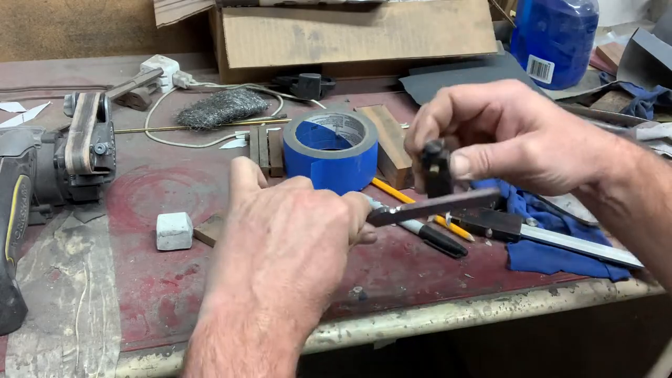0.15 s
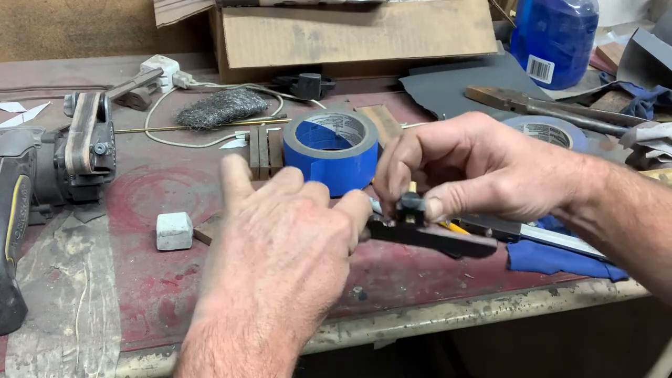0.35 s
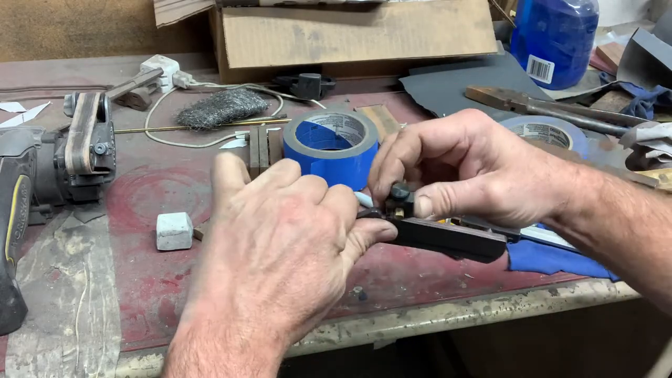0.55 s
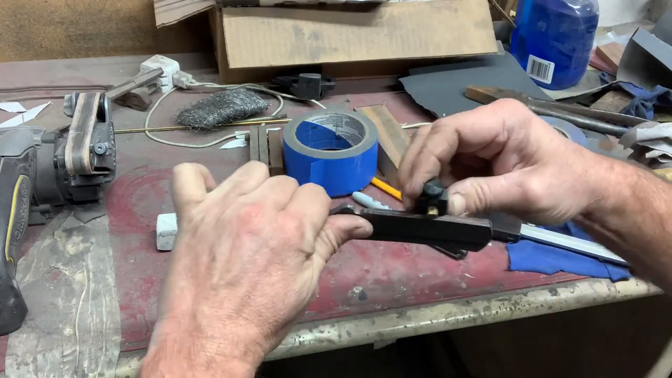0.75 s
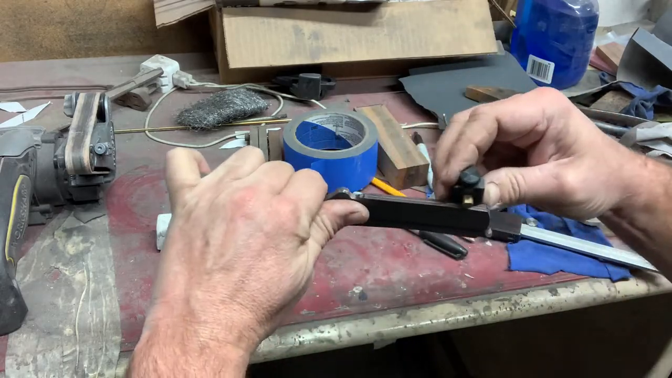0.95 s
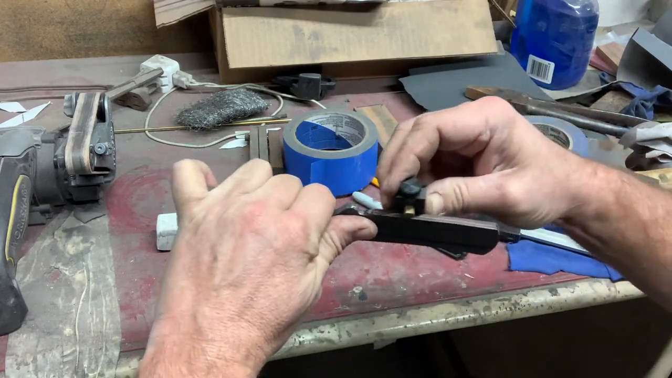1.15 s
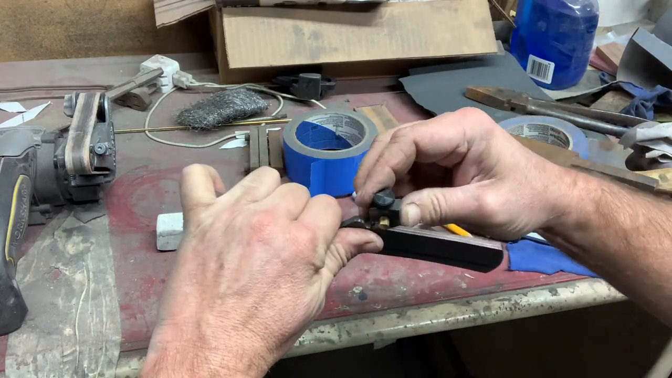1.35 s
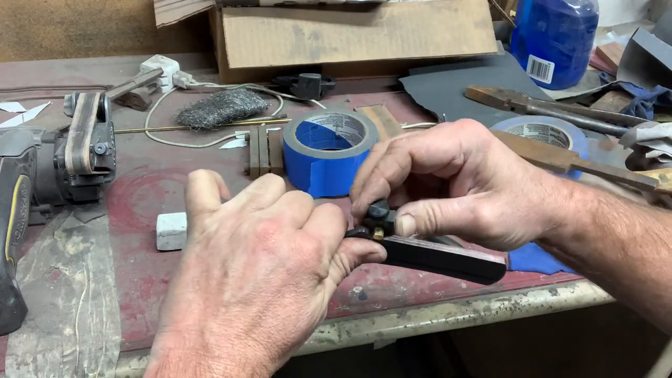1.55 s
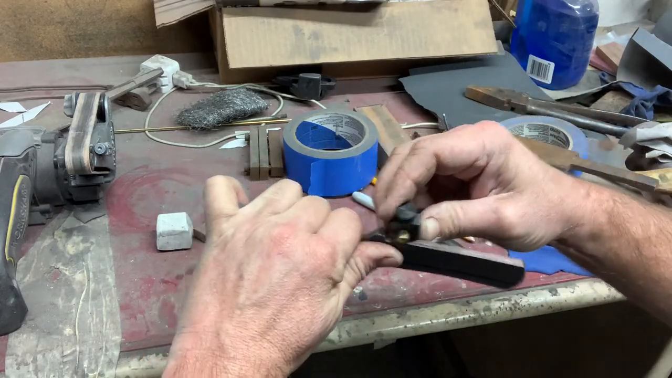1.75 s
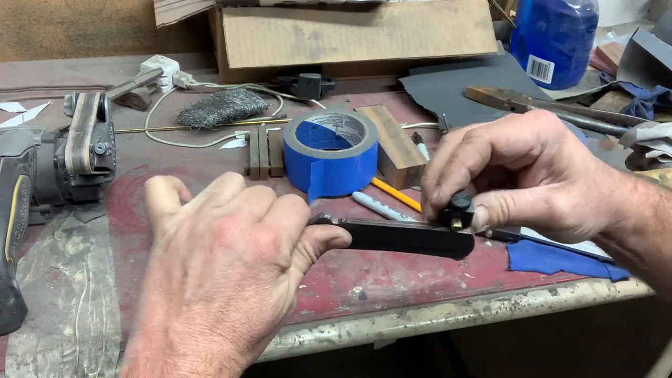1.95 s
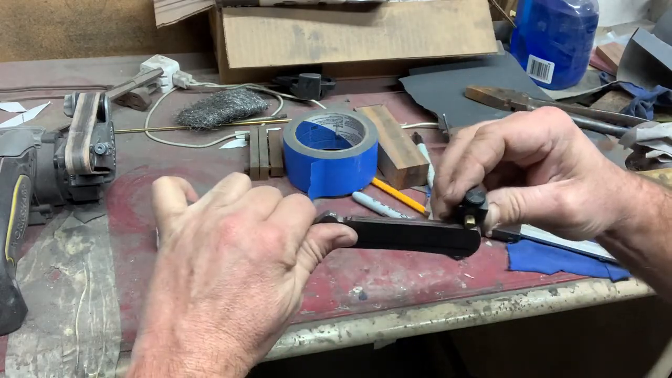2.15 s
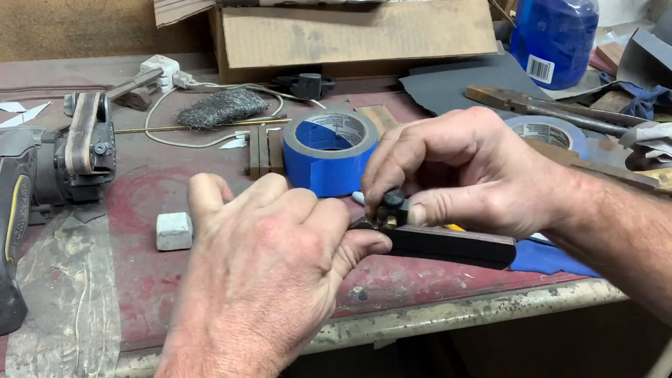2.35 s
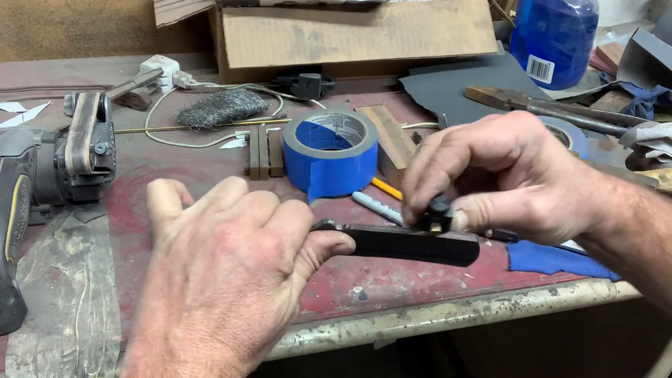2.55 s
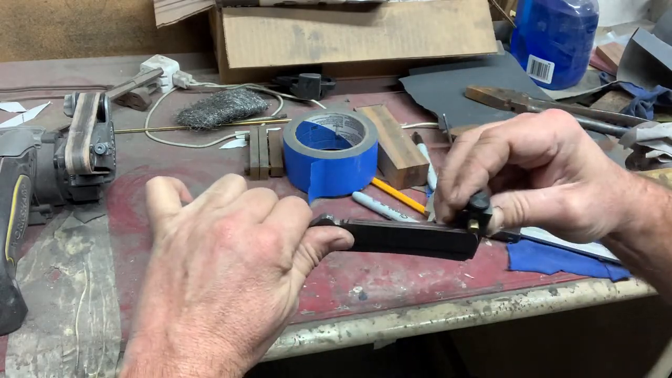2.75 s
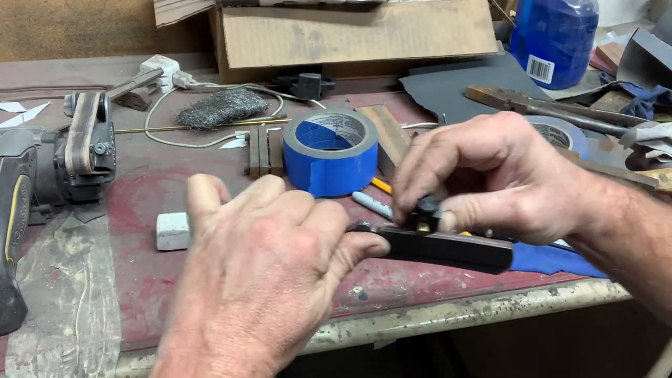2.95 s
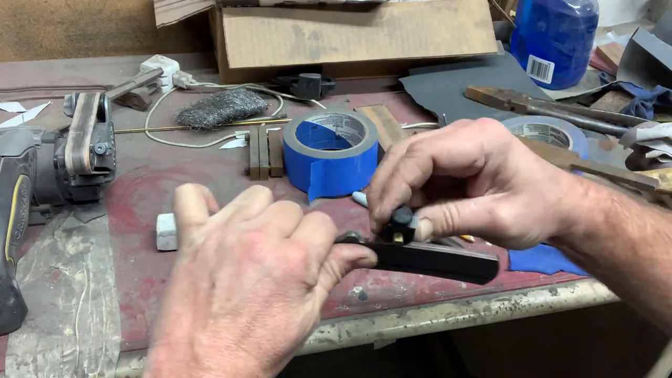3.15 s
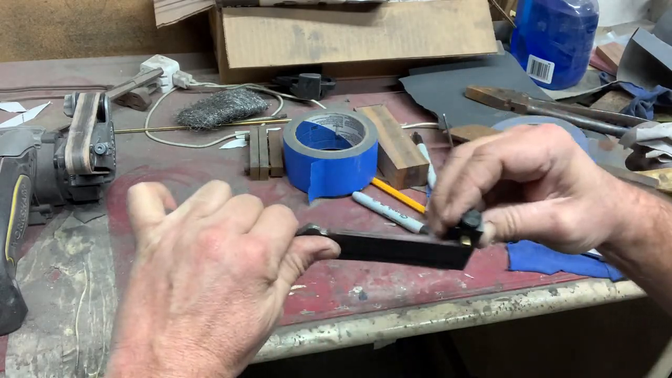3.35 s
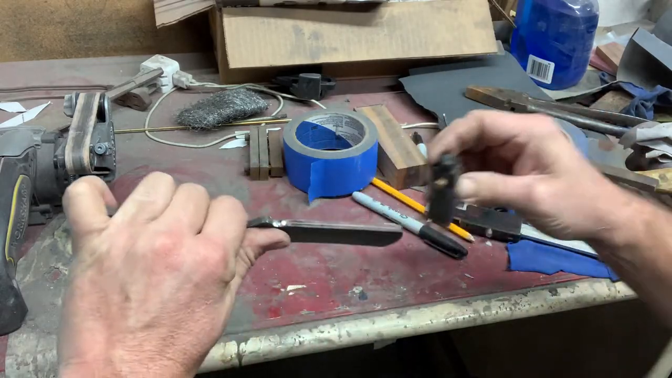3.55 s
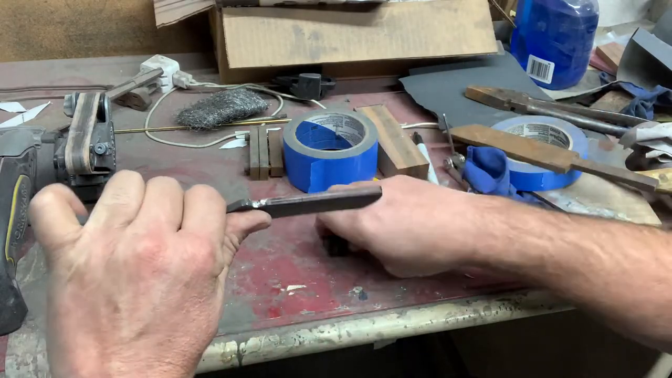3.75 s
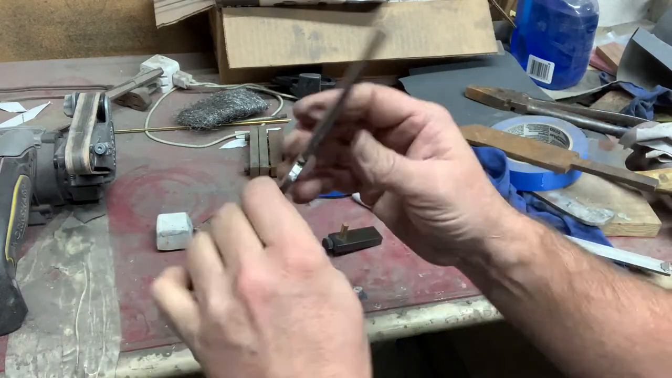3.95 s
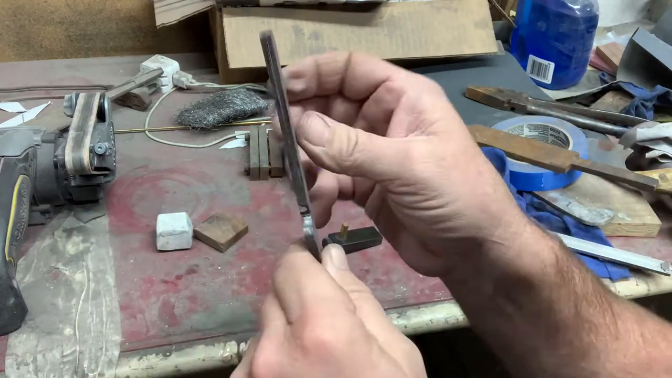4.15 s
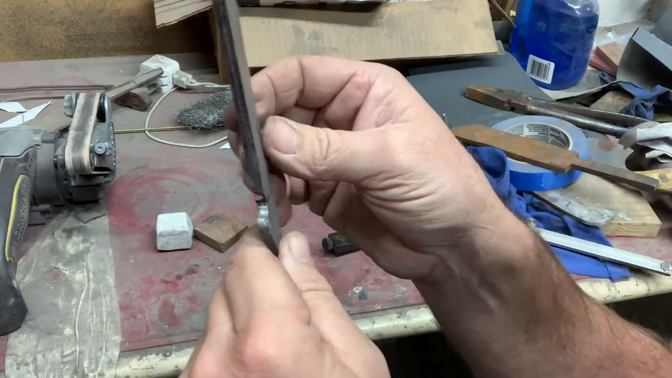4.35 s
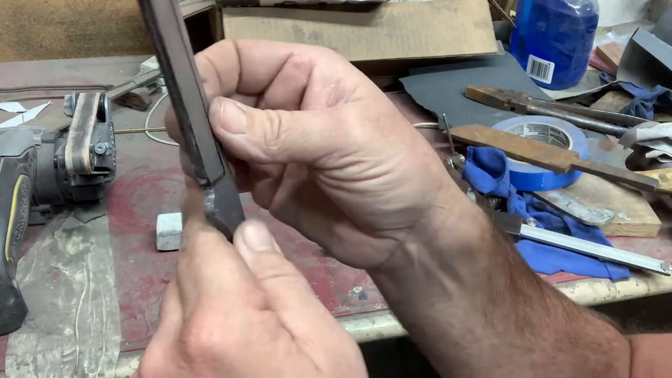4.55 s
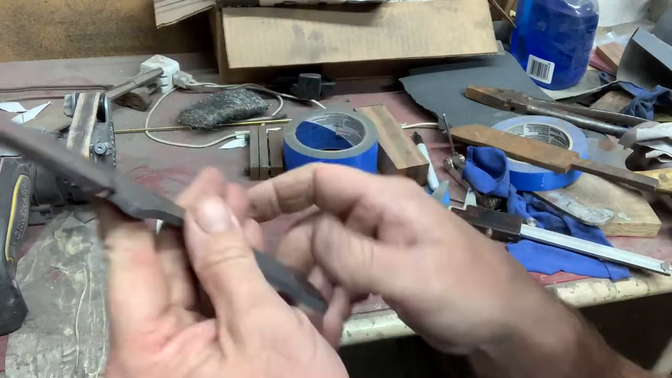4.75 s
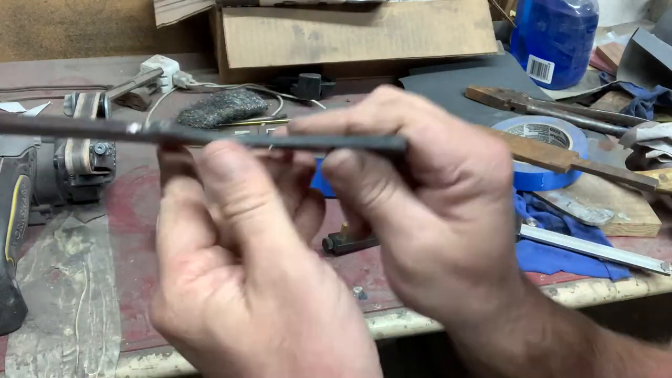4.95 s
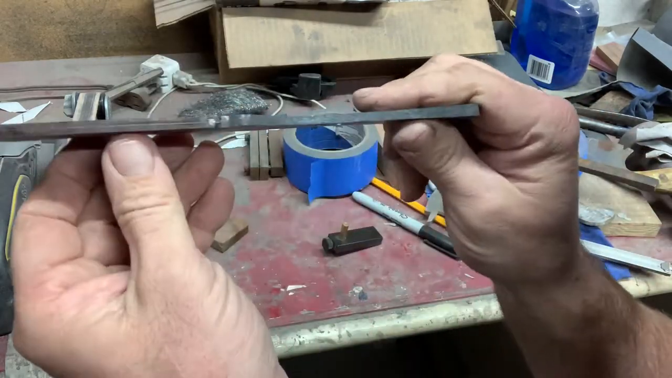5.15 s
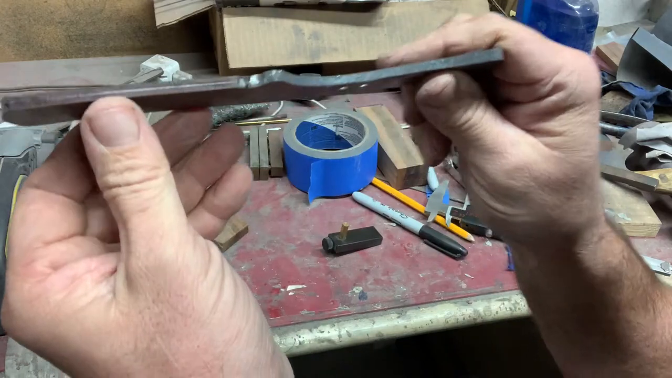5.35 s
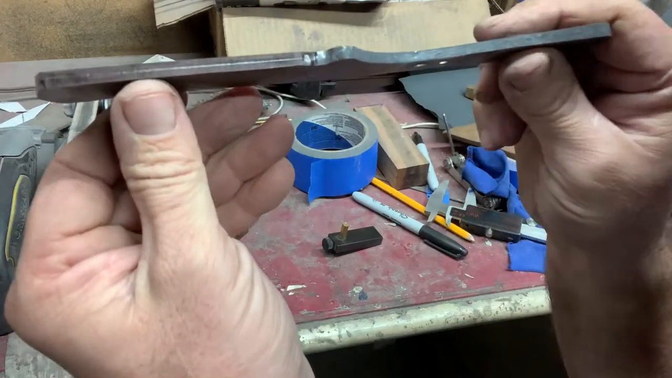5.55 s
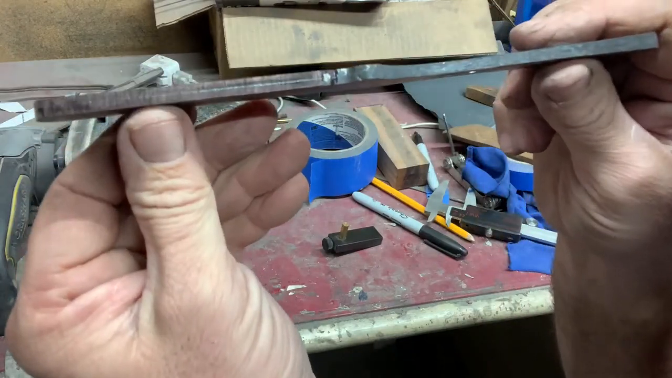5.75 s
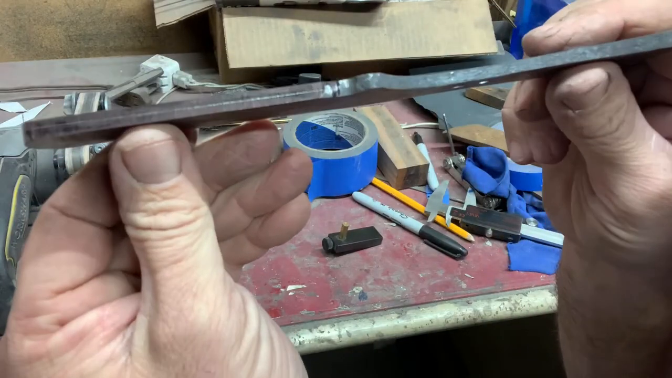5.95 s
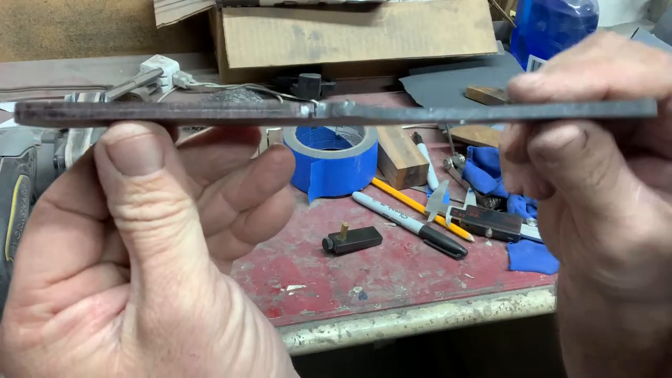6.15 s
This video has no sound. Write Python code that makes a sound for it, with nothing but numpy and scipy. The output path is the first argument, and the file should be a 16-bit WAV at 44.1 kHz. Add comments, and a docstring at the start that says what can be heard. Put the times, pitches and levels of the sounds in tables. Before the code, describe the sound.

A metal point scrapes a steel blade in short bright scratches, then a small tool knocks onto a bench, over a low fan hum.

```python
"""A scribe point is drawn along a steel blade in short strokes: random slips, shaped by pressure, ring the steel.
Brief noise skids and decaying sines make its ticks; light slips make fingers rustle, a swept sine squeaks.
The gauge that holds the scribe is put down on the bench: filtered pushes with a rattle drive bench modes.
A fan hums behind it all: coloured stereo noise with room modes and wavering motor tones."""
import sys
import numpy as np
from scipy import signal
from scipy.fft import rfft, irfft
from scipy.io import wavfile
from scipy.ndimage import uniform_filter1d

SR = 44100
rng = np.random.default_rng(int(sys.argv[2]) if len(sys.argv) > 2 else 0)


def transcribe(signal):
    """Save signal, clipped to [-1, 1], as a 16-bit WAV file at the path in sys.argv[1]."""
    frames = np.atleast_2d(signal).T
    limited = np.clip(frames, -1, 1)
    pcm = np.round(limited * 32767).astype(np.int16)
    wavfile.write(sys.argv[1], SR, pcm)


N = 273861
TIME = np.arange(N) / SR  # s
FFT_HZ = np.fft.rfftfreq(N, 1 / SR)


def gain_of(db):
    """Decibels to amplitude."""
    return 10 ** (np.asarray(db) / 20)


def evened(x):
    """Scales to rms 1."""
    return x / np.sqrt(np.mean(x ** 2) + 1e-20)


def read(points, hz):
    """Interpolates a table on a log-frequency axis."""
    f, value = np.transpose(points)
    return np.interp(np.log(hz + 1), np.log(abs(f) + 1), value)


def add(mix, start_s, sound):
    """Mixes a sound in at a time, in place."""
    part = mix[round(start_s * SR):][:len(sound)]
    part += sound[:len(part)]


def wander(hz):
    """Random motion of rms 1, mostly slower than hz."""
    lowpass = 1 / (1 + (FFT_HZ / hz) ** 4)
    return evened(irfft(rfft(rng.standard_normal(N)) * lowpass, N))


def treble(x, hz):
    """The part of a sound above hz."""
    highpass = 1 - 1 / (1 + (FFT_HZ / hz) ** 12)
    return irfft(rfft(x) * highpass, N)


def body(drive, colour, modes, size=16384):
    """An object answers each push with a short causal click and its dying modes."""
    hz = abs(np.fft.fftfreq(size, 1 / SR))
    t = np.arange(size) / SR
    # minimum phase: the log spectrum and its Hilbert transform give a causal click
    click = np.exp(np.conj(signal.hilbert(np.log(gain_of(read(colour, hz))))))
    ring = np.zeros(size)
    for f, db, t60_s in modes:
        peak_scale = 2 * np.log(1000) / (t60_s * SR)  # makes db the resonance gain
        ring += gain_of(db - 60 * t / t60_s) * np.cos(2 * np.pi * f * t) * peak_scale
    answer = np.fft.ifft(click * (1 + np.fft.fft(ring))).real
    return signal.oaconvolve(drive, answer / np.linalg.norm(answer))[:N]


# Workshop decay. Each row: frequency in Hz, t60 in s.
ROOM_DECAY = [(300, 0.75), (1500, 0.24), (3000, 0.19), (6000, 0.19), (10000, 0.1807), (16000, 0.1)]


def room(spacing=8):
    """Sparse reflections off bench clutter and walls, one per spacing samples; treble dies first."""
    at = np.arange(100, SR // 2, spacing)
    places = at + rng.integers(0, spacing, (2, len(at)))
    taps = np.zeros((2, SR // 2 + spacing))
    np.put_along_axis(taps, places, rng.choice([-1., 1.], (2, len(at))), 1)
    hz, t, bands = signal.stft(taps, SR, nperseg=256)
    decay = gain_of(-60 * t / read(ROOM_DECAY, hz)[:, None])
    tail = signal.istft(bands * decay, SR, nperseg=256)[1]
    return tail / np.linalg.norm(tail[0])


def place(x, phase, lean, wet_db):
    """The direct sound reaches the two ports out of step and unequally loud; the room follows."""
    half = gain_of(read(lean, FFT_HZ) / 2)
    left_right = np.array([half * np.exp(1j * read(phase, FFT_HZ)), 1 / half])
    direct = irfft(rfft(x) * left_right, N)
    reflected = signal.fftconvolve(np.atleast_2d(x), room(), axes=1)[:, :N]
    return direct + gain_of(wet_db) * reflected


def friction(slips_per_s, spread_db, chatter_hz, chatter_db):
    """Tiny slips of uneven size; the chatter of the contact swells and thins them."""
    size = gain_of(spread_db * np.minimum(rng.exponential(1, N), 4)) * rng.choice([-1., 1.], N)
    slips = size * (rng.random(N) < slips_per_s / SR)
    return evened(slips * gain_of(chatter_db * wander(chatter_hz)))


RUN_IN_DB, RELEASE_DB_PER_S = 46.5, 699.5


def rub(start_s, run_in_s, hold_s, db, change_db=0):
    """Amplitude of one rubbing gesture: it swells, holds while the pressure drifts, and lifts off."""
    t = TIME - start_s
    swell = RUN_IN_DB * np.minimum(t / max(run_in_s, .002), 0)
    held = change_db * np.clip(t / max(hold_s, .002), 0, 1)
    lift = RELEASE_DB_PER_S * np.maximum(t - hold_s, 0)
    return gain_of(np.maximum(db + swell + held - lift, -200))


def travel(x, shared_db, apart_db, apart_radians, frames=9):
    """As if passing nodes of the blade, bands swell and fade at random, a little differently at each port."""
    bands = signal.stft(x, nperseg=512, noverlap=384)[2]
    noise = rng.standard_normal((5,) + bands.shape)
    smooth_hz = uniform_filter1d(noise, size=3, axis=1)
    patches = evened(uniform_filter1d(smooth_hz, size=frames, axis=2))
    level = gain_of(shared_db * patches[0] + apart_db * patches[1:3])
    turn = np.exp(1j * apart_radians * patches[3:])
    return signal.istft(bands * level * turn, nperseg=512, noverlap=384)[1][:, :N]


# Fan air noise. Each row: frequency in Hz, relative density in dB per Hz.
AIR_COLOUR = [(20, -47), (48, -29.5), (75, -12), (170, -9.5), (230, -15), (340, -17.5), (800, -17),
              (1300, -19.5), (2500, -27.3), (5000, -34), (8000, -43.5), (12000, -55), (16000, -62)]
# Room modes under the fan. Each row: frequency in Hz, width in Hz, boost in dB.
ROOM_BOOM = [(83, 18, 4), (120.8, 21, 10.5), (163.1, 20.7, 11.5), (282, 23, 6.5), (367, 12, 5.5),
             (741, 48, 6)]
# Left-right likeness of the air noise. Each row: frequency in Hz, coherence from -1 to 1.
AIR_COHERENCE = [(60, 1), (130, 0.96), (290, 0.87), (640, 0.43), (1410, -0.42), (3100, -0.086),
                 (6820, -0.37), (15000, 0.97)]
# Slow swell of the rumble. Each row: time in s, gain in dB.
RUMBLE_SWELL = [(0, 0.5), (1.2, 1), (2.4, 1), (3.4, 0), (4.4, -1.5), (5.4, 0.5), (6.2, -0.5)]
# Motor tones. Each row: frequency in Hz before drift, rms level in dB before waver.
MOTOR_TONES = [(201.7, -59.5), (240, -68.5), (403.6, -67.5)]
AIR_DB = -49


def fan(waver_db=2.5, drift_hz=0.84):
    """Air noise booms in the room's low modes under the motor's wavering tones."""
    first, second = rfft(rng.standard_normal((2, N)))
    same = np.clip(read(AIR_COHERENCE, FFT_HZ), -1, 1)
    colour = read(AIR_COLOUR, FFT_HZ)
    for f, width_hz, db in ROOM_BOOM:
        colour = colour + db / (1 + (2 * (FFT_HZ - f) / width_hz) ** 2)
    # (Hz, dB taken from the left and given to the right)
    lean = read([(300, 0), (800, 0.75), (1300, 1.17), (4000, 0.34)], FFT_HZ)
    left_right = np.array([first, same * first + np.sqrt(1 - same ** 2) * second])
    air = evened(irfft(left_right * gain_of([colour - lean, colour + lean]), N))
    rumble = air - treble(air, hz=259)
    swell = gain_of(np.interp(TIME, *np.transpose(RUMBLE_SWELL)))

    drift, waver = drift_hz * wander(2.91), waver_db * wander(3.1)
    tones = np.zeros(N)
    for f, db in MOTOR_TONES:
        turns = np.cumsum(f + drift) / SR
        tones += np.sqrt(2) * gain_of(db + waver) * np.sin(2 * np.pi * turns)
    return gain_of(AIR_DB) * (air + (swell - 1) * rumble) + tones


# The gauge lands and rocks once. Each row: start in s, relative level in dB, contact time in s.
BENCH_KNOCKS = [(3.7215, -13.5, 0.000092), (3.7236, -1.5, 0.00015), (3.7563, -6, 0.00068)]
# Colour of a blow on the bench. Each row: frequency in Hz, relative density in dB per Hz.
THUD_COLOUR = [(100, -44), (450, -15), (650, -14), (850, -16), (1080, -22), (1300, -4), (1720, -13),
               (2100, -5.5), (2450, -10.5), (2900, -4), (3500, -8.5), (4400, -13), (5500, -15.5),
               (6900, -25.5), (8000, -30)]
# Modes of gauge and bench top. Each row: frequency in Hz, level over the thud in dB, t60 in s.
BENCH_MODES = [(843, 9, 0.025), (1180, 5.5, 0.038), (1410, -4, 0.11), (1700, -4, 0.041), (2075, 16, 0.11),
               (2156, 11.5, 0.06), (2790, 7.5, 0.019), (2920, 4, 0.013), (3620, 3, .05), (4220, 11, 0.069),
               (6745, 11, 0.074)]


def knock(level_db=9, rattle_db=-30, rattle_t60_s=0.053, lag_s=.0022):
    """The gauge meets the bench: a push, softer on the rebound, and a brief rattle."""
    t, drive = np.arange(SR // 10) / SR, np.zeros(N)
    for start_s, db, contact_s in BENCH_KNOCKS:
        rattle = gain_of(rattle_db - 60 * t / rattle_t60_s) * rng.standard_normal(len(t))
        force = rattle + (t == 0)
        give = np.exp(-2 * np.pi / (contact_s * SR))  # longer contact, duller push
        push = signal.lfilter([(1 - give) ** 2], [1, -2 * give, give ** 2], force)
        add(drive, start_s, gain_of(db + level_db) * push)
    # bending waves in the bench top carry treble faster than bass; lag_s is their delay at 2 kHz
    phase = 4 * np.pi * lag_s * np.sqrt(2000 * FFT_HZ)
    return body(irfft(rfft(drive) * np.exp(-1j * phase), N), THUD_COLOUR, BENCH_MODES)


# Steel under the fingers. Each row: grip in s, run-in in s, hold in s, relative level in dB.
FINGER_SLIDES = [(0.255, .025, 0.015, -51), (0.4, 0.18, 0.052, -57.5), (3.815, 0.059, 0.06, -62),
                 (3.985, .035, .052, -60.5), (4.547, .03, .015, -70), (4.77, 0.046, 0.025, -67),
                 (4.804, .004, .006, -61), (4.854, .03, 0.067, -73)]


def fingers(level_db=-2):
    """Light sliding gives a thin, high rustle in which the loosely held blade sings faintly."""
    slips = friction(slips_per_s=6000, spread_db=2, chatter_hz=70, chatter_db=1.5)
    drive = slips * sum(rub(*row) for row in FINGER_SLIDES)
    # (Hz, relative dB per Hz)
    rustle = [(1500, -6), (4000, -4.5), (9000, -2.5), (12500, -4.5), (15200, 3), (16000, -18)]
    # (Hz, dB over the rustle, t60 s)
    loose = [(3950, 14, 0.071), (5830, 15.0, 0.04), (10250, 8.4, 0.08), (15000, 8, 0.031)]
    return gain_of(level_db) * body(drive, rustle, loose)


SQUEAK_AT_S, SQUEAK_S, SQUEAK_HZ, SQUEAK_ARCH_HZ = 3.98, .066, 12150, 1100
SQUEAK_DB = -51


def squeak(rough_hz=260, flutter_db=4):
    """Skin sticks and slips very fast as the fingers take hold: one thin, rough arch of pitch."""
    arch = np.sin(np.pi * np.clip((TIME - SQUEAK_AT_S) / SQUEAK_S, 0, 1))
    turns = np.cumsum(SQUEAK_HZ + SQUEAK_ARCH_HZ * arch + rough_hz * wander(830)) / SR
    grip = evened(gain_of(flutter_db * wander(120)))
    return gain_of(SQUEAK_DB) * np.minimum(2 * arch, 1) * grip * np.sin(2 * np.pi * turns)


# Point lands or jumps a burr, or a nail catches it. Each row: start in s, relative level in dB, contact time in s.
STEEL_TICKS = [(0.097, -30, 0.0013), (0.1818, -29.5, 0.00094), (0.3673, -45, 0.0016),
               (0.6835, -28.5, 0.0043), (1.042, -29.5, .0027), (1.188, -23, 0.003), (1.197, -28, 0.0024),
               (1.673, -55.5, 0.002), (1.74, -32, 0.0036), (2.2799, -25.5, 0.0028), (2.4375, -28.5, 0.003),
               (2.9585, -20.5, 0.0021), (2.9935, -28, 0.0024), (3.006, -32, 0.0033), (3.102, -29, .003),
               (3.1556, -42, .0028), (3.199, -26.5, 0.0028), (3.218, -28, 0.0015), (3.335, -49, .0025),
               (4.7974, -75, 0.0014), (5.0994, -75, 0.0014), (5.62, -57, 0.015), (5.818, -57, .004)]
# Clear tones of the tapped blade. Each row: frequency in Hz, relative level in dB, t60 in s.
BLADE_PING = [(5780, -24.5, 0.13), (8300, -10, 0.025), (10500, 5.5, .013), (10930, -19.5, .11),
              (14950, -27, .1)]
# Colour of the point on steel, also for the scribe. Each row: frequency in Hz, relative density in dB per Hz.
SCRATCH_COLOUR = [(900, -31.5), (2000, -26.5), (2900, -10.5), (4100, -15.5), (5300, -3), (6500, 1),
                  (7900, -8.5), (9100, -4), (11000, -5), (13000, -14), (14300, -8.5), (14800, -4.5),
                  (15500, -3.5), (16000, -2.5)]
# Modes of blade and gauge, also for the scribe. Each row: frequency in Hz, level over the scratch in dB, t60 in s.
STEEL_MODES = [(3077, 2.5, 0.049), (3780, -1.5, 0.019), (4600, -11.5, 0.11), (5260, 3.5, 0.02),
               (5850, 1.5, 0.066), (5530, -9, 0.23), (6340, 3, 0.072), (6140, -5, 0.19), (6760, -4, 0.076),
               (7056, -8.5, 0.36), (7450, 9, 0.033), (9040, -16, 0.051), (10550, -3, 0.037),
               (10540, -18, 0.0396), (15600, -6, .04)]
CLEAN_CONTACT_S, MUTE_DB_PER_DOUBLING = 0.0018, 11


def ticks(ping_db=-1, shrill_db=-2):
    """Each landing is a skid that swells and dies; the briefer it is, the clearer the blade rings."""
    t = np.arange(SR // 10) / SR
    skids, pings = np.zeros((2, N))
    ping = np.zeros(len(t))
    for hz, db, t60_s in BLADE_PING:
        ping += np.sin(2 * np.pi * hz * t) * gain_of(db - 60 * t / t60_s)
    ping *= 1 - np.exp(-t / .0004)  # soft onset
    for start_s, db, contact_s in STEEL_TICKS:
        u = t / contact_s
        add(skids, start_s, gain_of(db) * rng.standard_normal(len(t)) * u * np.exp(1 - u))
        mute_db = MUTE_DB_PER_DOUBLING * np.log2(contact_s / CLEAN_CONTACT_S)
        add(pings, start_s, gain_of(db + ping_db - mute_db) * ping)
    drive = skids + gain_of(shrill_db) * treble(skids, hz=14400)
    return body(drive, SCRATCH_COLOUR, STEEL_MODES) + pings


# Each row: bite in s, run-in in s, hold in s, relative level in dB, change over the hold in dB,
# brightness above 12 kHz in dB before flicker.
SCRIBE_STROKES = [ (0.684, 0.038, 0.059, -32.5, -2, -6), (0.797, 0.045, 0.054, -48, -2, -6),
                  (0.975, 0.03, 0.091, -37, 5, 0.5), (1.18, 0.012, 0.02, -34.5, -7, -4),
                  (1.317, 0.025, .007, -46.5, -3, -8), (1.465, 0.015, 0.0073, -48.5, -1.5, -5),
                  (1.753, 0.026, 0.022, -40, 7, -5), (1.848, 0.021, 0.068, -38.5, -1, -0.5),
                  (2.198, 0.032, 0.067, -27.5, -9.5, 5.5), (2.29, .02, 0.041, -36, -6.5, 3),
                  (2.435, 0.028, 0.08, -33, -2, -0.5), (2.535, 0.028, 0.085, -46.5, -7.5, -3),
                  (2.886, 0.068, 0.097, -30, -7, -0.5), (2.96, 0.0091, .014, -30, -3, 12),
                  (3.095, 0.013, 0.01, -38, -13, 6), (3.146, 0.033, .045, -49.5, -1, -9),
                  (3.204, 0.028, 0.084, -30.5, -10.5, 1), (3.335, 0.031, 0.014, -42.5, -4, -7), ]
TREMOR_HZ, TREMOR_DB = 45, -0.12  # unsteady hand pressure
FLICKER_HZ, FLICKER_DB = 70, 5  # the top of the hiss flickers


def scribe(dull_share=0.41, firm_db=-29.5, lightest_db=-60):
    """The point sticks and slips on the steel: a light touch sounds hollow, a hard bite bright."""
    levels = [rub(*row[:5]) for row in SCRIBE_STROKES]
    pressure = sum(levels)
    # each stroke's brightness counts by its share of the pressure
    bright_db = sum(level * row[5] for level, row in zip(levels, SCRIBE_STROKES)) / pressure
    slips = friction(slips_per_s=5000, spread_db=1.0, chatter_hz=139.8, chatter_db=0.6)
    drive = slips * pressure * gain_of(TREMOR_DB * wander(TREMOR_HZ))
    upper, top = treble(drive, hz=4500), treble(drive, hz=12000)
    lower, middle = drive - upper, upper - top
    pressure_db = np.maximum(20 * np.log10(pressure), lightest_db)
    hollow = gain_of(dull_share * (firm_db - pressure_db))
    sharp = gain_of(bright_db + FLICKER_DB * wander(FLICKER_HZ))
    return body(hollow * lower + middle + sharp * top, SCRATCH_COLOUR, STEEL_MODES)


# Lead of the left port, blade and bench. Each row: frequency in Hz, phase in radians.
BLADE_LEAD = [(500, 0), (3000, -.5), (5000, -1.3), (5700, -6.3), (6900, -6.7), (7600, -11.4), (9500, -11.4),
              (11500, -10.8), (16000, -9.7)]
BENCH_LEAD = [(50, 0), (860, -.1), (1300, -1.5), (1720, -4.8), (2200, -6.3), (2930, -7.2), (4570, -12.8),
              (7500, -22)]
# Left minus right level, blade and bench. Each row: frequency in Hz, difference in dB.
BLADE_BALANCE = [(3000, -1.5), (4500, -2), (5500, -4.5), (7300, -4.5), (9000, 0.5), (10500, -1.5),
                 (13000, -3), (15000, -0.5)]
BENCH_BALANCE = [(700, 4), (1300, -23.5), (2200, -1), (4400, -4.5), (8000, 5)]


def scene():
    """Blade and bench in front of the microphone, the fan all around."""
    rubbing = travel(scribe() + fingers(), shared_db=3.2, apart_db=2, apart_radians=.3)
    blade = place(rubbing + ticks() + squeak(), BLADE_LEAD, BLADE_BALANCE, wet_db=-7)
    bench = place(knock(), BENCH_LEAD, BENCH_BALANCE, wet_db=-7)
    return blade + bench + fan()


EDGE_HZ = 15900


def record(dry):
    """The recorder's band limit: a linear-phase lowpass."""
    lowpass = signal.firwin(361, EDGE_HZ, window=("kaiser", 8), fs=SR)
    return signal.oaconvolve(dry, lowpass[None], "same")


dry = scene()
out = record(dry)
transcribe(out)
```